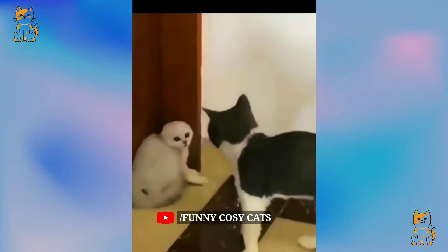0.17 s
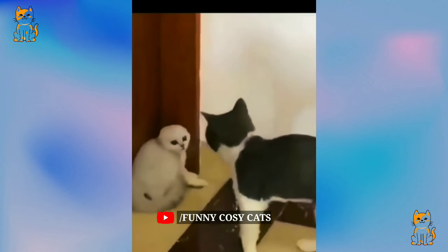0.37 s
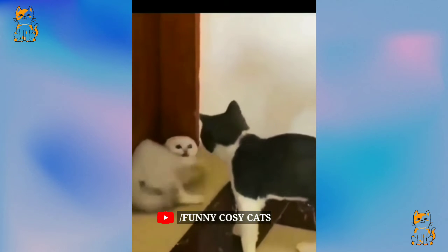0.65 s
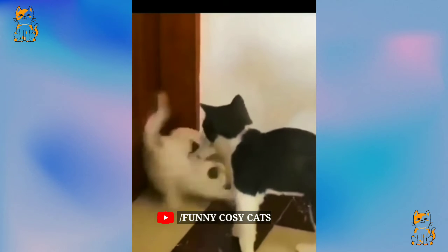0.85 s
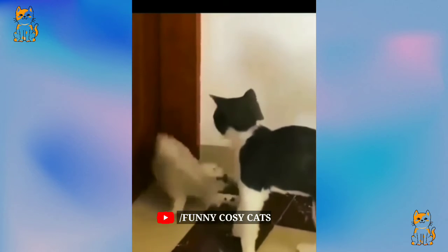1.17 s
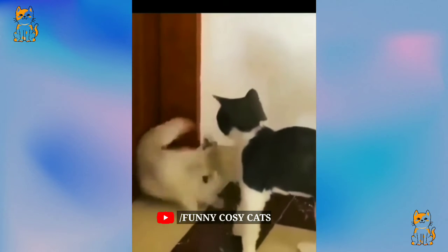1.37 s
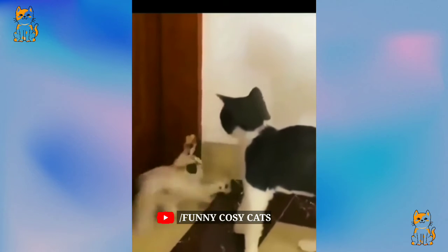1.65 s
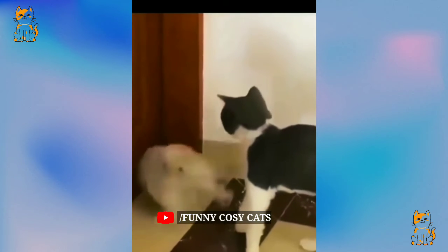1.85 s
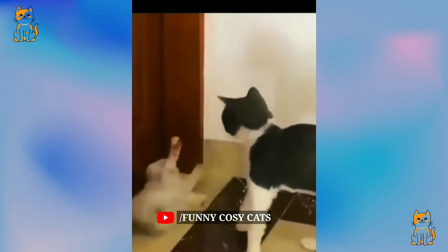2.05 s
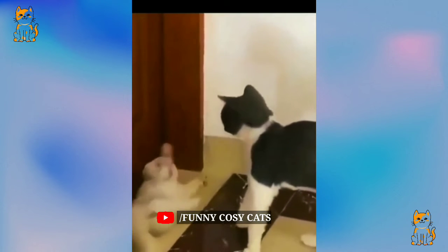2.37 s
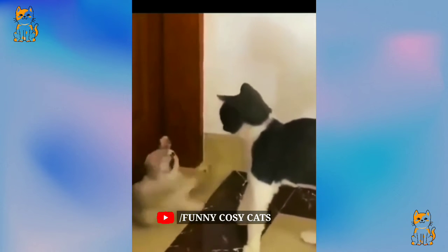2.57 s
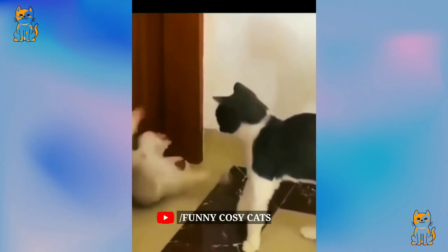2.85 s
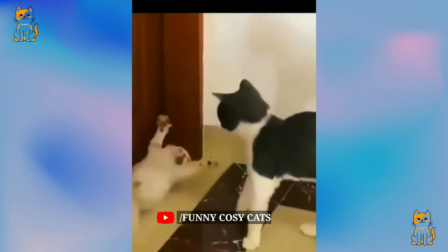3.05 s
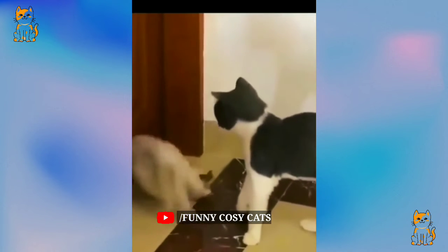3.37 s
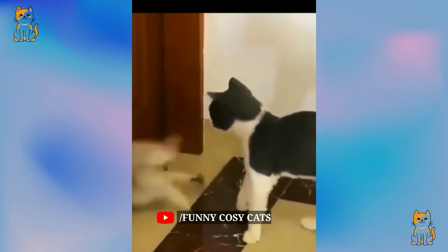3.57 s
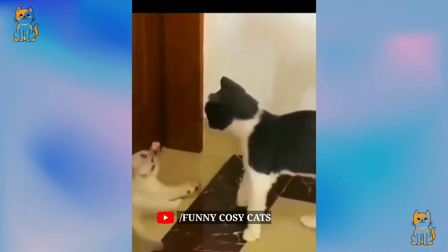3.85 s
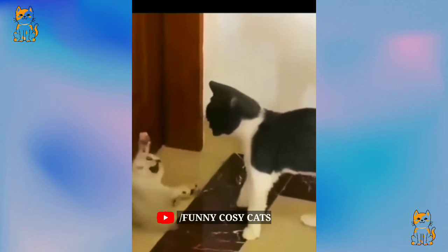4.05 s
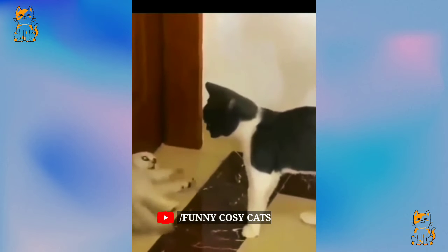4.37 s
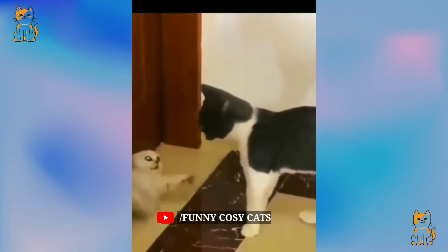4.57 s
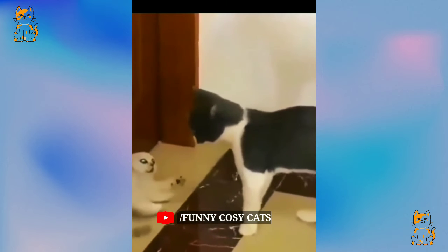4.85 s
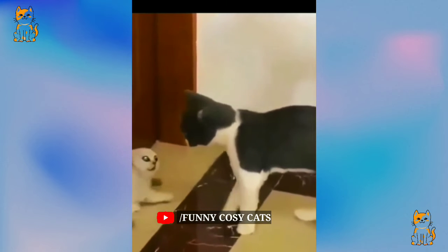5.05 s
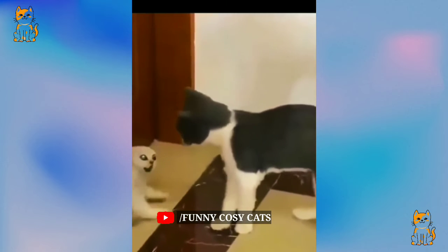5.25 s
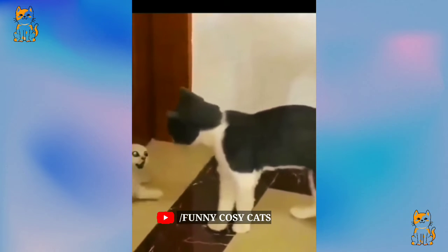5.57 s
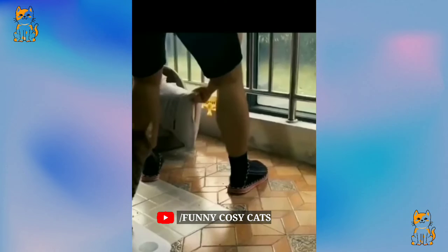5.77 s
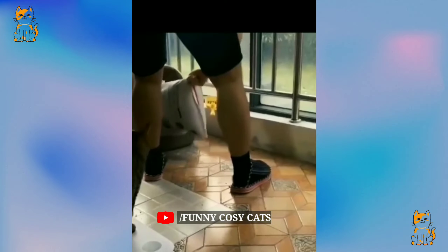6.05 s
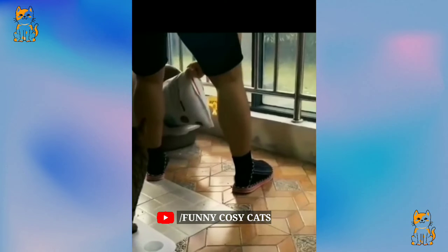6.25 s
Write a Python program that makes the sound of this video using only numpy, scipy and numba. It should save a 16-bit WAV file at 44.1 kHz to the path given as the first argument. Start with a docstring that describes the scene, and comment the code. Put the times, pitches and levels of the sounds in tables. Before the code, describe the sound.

In a bare tiled room, a kitten's low moan swells into a rasping scream with sharp spits. Fur slides and its body thuds on the floor. A second hoarse scream follows, then a high shriek sinking into a moan. A final clear rising cry is cut dead by rustling, small knocks and outdoor rumble. Phone microphone, moderately close, dull on top.

```python
"""A bare, tiled room: a cornered kitten yowls four times and tumbles on the floor between calls.
An uneven larynx drives throat and mouth resonances that climb with the jaw; air hisses at the teeth.
Filtered noise makes sliding fur, thuds, scraping paws and room tone; walls add echoes and a tail.
The last yowl is cut off by a change of scene: a balcony, with grainy rustling noise, rumble and knocks."""
import sys
import numpy as np
from scipy import signal
from scipy.fft import rfft, irfft
from scipy.io import wavfile
from scipy.ndimage import uniform_filter1d
from numba import njit

SR = 44100
rng = np.random.default_rng(int(sys.argv[2]) if len(sys.argv) > 2 else 0)


def digitize_waveform(pressure):
    """Quantize a signal to 16-bit integers and store it at the path in sys.argv[1].

    Rows of a 2-D input are taken as channels; values are limited to [-1, 1].
    """
    field = np.atleast_2d(pressure).T
    bounded = np.clip(field, -1, 1)
    quanta = np.round(bounded * 32767).astype(np.int16)
    wavfile.write(sys.argv[1], SR, quanta)


N = 282240
T = np.arange(N) / SR  # s


def undb(db):
    """Decibels to gain."""
    return 10 ** (np.asarray(db) / 20)


def unit(x):
    """Scale to rms 1."""
    return x / np.sqrt(np.mean(x ** 2))


def even(x):
    """Hold the rms at 1 over 40 ms, keeping the faster flutter."""
    power = uniform_filter1d(x ** 2, size=1764)
    return x / np.sqrt(np.abs(power) + 1e-12)


def contour(s, db, fade_s=0.034):
    """Gain curve through dB points, fading out beyond both ends."""
    gate = np.interp(T, [s[0] - fade_s, s[0], s[-1], s[-1] + fade_s], [0, 1, 1, 0])
    return gate * undb(np.interp(T, s, db))


def swells(table):
    """Gain curve of bell-shaped swells from rows of (start_s, level_db, length_s), start being the peak."""
    return sum(undb(db) * np.exp(-((T - s) / length * 2) ** 2) for s, db, length in table)


def walk(rate_hz):
    """Smooth chance with rms 1, changing about rate_hz times a second."""
    hold = max(int(SR / rate_hz), 2)
    steps = np.repeat(rng.standard_normal(N // hold + 1), hold)
    return unit(uniform_filter1d(steps, hold)[:N])


def noise(colour, grain_db=0):
    """Noise with a spectrum of (freq_hz, level_db) points; grain_db breaks it into grains."""
    hz, db = np.transpose(colour)
    f = np.maximum(np.fft.rfftfreq(N, 1 / SR), 1)
    grains = rng.standard_normal(N) * undb(grain_db * walk(900))
    spectrum_gain = undb(np.interp(np.log(f), np.log(hz), db))
    return unit(irfft(rfft(grains) * spectrum_gain, N))


@njit
def svf(x, hz, width_hz):
    """State-variable band-pass whose centre and width move."""
    y, band, low = np.empty(len(x)), 0., 0.
    for i in range(len(x)):
        g, k = np.tan(np.pi * hz[i] / SR), width_hz[i] / hz[i]
        v = (band + g * (x[i] + 1e-18 - low)) / (1 + g * (g + k))
        band, low, y[i] = 2 * v - band, low + 2 * g * v, k * v
    return y


def resonance(x, hz, width_hz):
    """A resonance with steep skirts: the band-pass applied twice."""
    hz = np.minimum(hz, .45 * SR) * np.ones(N)
    width_hz = width_hz * np.ones(N)
    return svf(svf(x, hz, width_hz), hz, width_hz)


def body(x, modes):
    """Resonances side by side, rows (freq_hz, half_width_hz, level_db); alternating signs fill valleys."""
    out = 0
    for k, (hz, half_width_hz, db) in enumerate(modes):
        out = out + (-1) ** k * undb(db) * resonance(x, hz, 2 * half_width_hz)
    return out


def lowpass(x, hz):
    """Steep elliptic low-pass."""
    return signal.sosfilt(signal.ellip(8, .2, 70, hz, fs=SR, output="sos"), x)


def room_tone():
    """Steady low-heavy noise of the room, its level drifting slightly."""
    # spectrum: freq_hz, level_db
    tone_colour = [(15, -69), (25, -26), (48, -8), (145, 2.5), (177, -4), (205, -3), (292, -9), (348, -3),
                   (447, -18.5), (494, -10.5), (815, -7.5), (972, -14.5), (2460, -30.5), (3000, -33.5),
                   (10000, -48), (13000, -93), (22000, -120)]
    return undb(-45 + .5 * walk(7.6)) * noise(tone_colour)


def ringing(level_db=-40, t60_s=0.7):
    """The room's ring of an earlier hiss dies away exponentially."""
    # spectrum: freq_hz, level_db
    ring_colour = [(350, -45), (600, -18), (906, -12), (984, -14), (1270, 0), (1580, -11), (3050, -3),
                   (5620, -14), (10000, -40), (13000, -70), (22000, -120)]
    return undb(level_db) * np.exp(-np.log(1000) * T / t60_s) * noise(ring_colour)


def crumple(x, patchy_db):
    """Each third of an octave swells and fades on its own, as folds of a rustled thing come and go."""
    octave = np.log2(np.maximum(np.fft.rfftfreq(N, 1 / SR), 1))
    spectrum = rfft(x)
    out = 0
    for k in range(23, 43):  # thirds of an octave above 1 Hz
        band = irfft(spectrum * np.maximum(1 - np.abs(3 * octave - k), 0), N)
        out = out + band * undb(patchy_db * walk(35))
    return unit(out)


def knocks():
    """Light contacts: decaying noise through shared modes, favouring those near each contact's pitch."""
    # contacts: start_s, level_db, brightest_ring_hz, decay_s (to 1/e)
    contacts = [(5.85, -32.5, 8000, .01), (6.017, -33, 1700, 0.01), (6.038, -35, 900, 0.024),
                (6.146, -30.5, 1730, 0.0067), (6.221, -26, 4200, 0.0032), (6.342, -35, 3000, .005)]
    # struck object's modes: freq_hz, half_width_hz, level_db
    knock_modes = [(980, 290, 10), (1830, 180, 11.5), (2760, 200, 6), (3970, 380, 1), (8900, 4200, -6)]
    out = 0
    for s, db, bright_hz, decay_s in contacts:
        modes = [(f, width, mode_db - 7 * abs(np.log2(f / bright_hz))) for f, width, mode_db in knock_modes]
        decay = np.exp(-np.abs(T - s) / decay_s) * (T >= s)
        out = out + undb(db) * decay * unit(body(rng.standard_normal(N), modes))
    return out


def balcony(rustle_db=-1, crisp_db=-8, handling_db=-41, outdoors_db=-40):
    """Grainy rustling with dull bumps and light knocks over an outdoor rumble, all shaped noise."""
    # rustling bouts: start_s (peak), level_db, length_s
    rustle_bouts = [(5.87, -41.5, 0.062), (5.97, -39.5, 0.14), (6.22, -47, 0.077), (6.35, -49, 0.037)]
    # spectra of rustle, its crisp treble and the outdoor rumble: freq_hz, level_db
    rustle_colour = [(240, -36), (400, -18), (594, -5.5), (655, -21), (677, -15), (789, -8), (871, -18),
                     (1050, -12.5), (1680, -4.5), (2340, -14.5), (2980, -10), (4510, -20.5), (5500, -15.5),
                     (7150, -47), (12100, -120)]
    crisp_colour = [(2650, -27), (4500, -26), (5980, -7.5), (6670, -9.5), (8260, -11.5), (9710, -14),
                    (11500, -11.5), (13000, -22), (14000, -34)]
    outdoor_colour = [(15, -52), (25, -24), (70, 3.5), (108, -10), (145, 2.5), (189, -11.5), (267, -8),
                      (372, -9), (408, -8), (600, -41), (780, -35), (1320, -120)]
    bouts = swells(rustle_bouts)
    handling = undb(handling_db) + bouts
    rustle = undb(rustle_db) * handling * crumple(noise(rustle_colour, grain_db=-0.5), patchy_db=4.0)
    crisp = undb(crisp_db) * handling * noise(crisp_colour, grain_db=1.5)
    rumble = (undb(outdoors_db) + bouts) * noise(outdoor_colour)  # bouts bump it too
    return rustle + crisp + rumble + knocks()


def scuffle(fur_db=-2, rumble_db=-8.0, paw_hz=3000, attack_s=0.059, decay_s=0.086):
    """Fur slides on the tiles, the tumbling body rumbles, paws scrape: bursts of coloured noise."""
    # fur slides and paw scrapes: start_s (peak), level_db, length_s
    slides = [(1.64, -38.5, 0.14), (1.88, -40.5, 0.24), (2.08, -30.5, .2), (2.33, -41.5, .06)]
    scrapes = [(2.306, -59, 0.027), (2.604, -58, 0.022), (5.105, -63, 0.032)]
    # body landings: start_s (peak), level_db
    thuds = [(1.7, -26.5), (1.84, -31.5), (2.03, -31), (2.42, -42.5)]
    # spectra: freq_hz, level_db
    fur_colour = [(120, -47), (200, -5.5), (425, -7.5), (672, -2), (778, -15), (1120, -4.5), (1340, -11.5),
                  (4000, -17.5), (10000, -30), (13000, -85), (22000, -120)]
    rumble_colour = [(18, -24), (30, -21), (54, 4.5), (97, -22.5), (129, 1.5), (167, -18), (227, -16),
                     (300, -29), (390, -53), (660, -120)]
    fur = undb(fur_db) * swells(slides) * noise(fur_colour, grain_db=1)
    paws = swells(scrapes) * unit(resonance(rng.standard_normal(N), paw_hz, 8000))
    weight = 0
    for s, db in thuds:
        weight = weight + undb(db) * np.exp(-np.maximum((s - T) / attack_s, (T - s) / decay_s))
    return fur + paws + undb(rumble_db) * weight * noise(rumble_colour)


def larynx(hz, rough, press, jitter=0.03505, waver=0.00592, stumble=0.01495, wander=0.00707, air=2.1,
           leak=0.042, rasp_db=2.5, flicker_db=8.5, soft_slope=1.28, hard_slope=0.025):
    """Vocal folds: mellow harmonics in a moan; uneven cycles, broken partials, air puffs in a scream."""
    wobble = jitter * rough * walk(450) + (waver + stumble * rough) * walk(50)
    wobble = wobble + wander * np.sqrt(rough) * walk(110)
    phase = 2 * np.pi * np.cumsum(hz * (1 + wobble)) / SR
    # pressed folds snap shut, which lifts the upper harmonics
    slope = soft_slope + (hard_slope - soft_slope) * press
    flicker = flicker_db * np.sqrt(rough)
    folds = even(sum(np.sin(k * phase) * undb(flicker * walk(40)) / k ** slope for k in range(1, 23)))
    puffs = unit(rng.standard_normal(N) * np.exp(np.cos(phase)))
    rasp = undb(rasp_db * np.sqrt(rough) * walk(140))
    # slack folds leak a little air even in a clean moan
    airflow = air * rough ** 1.28 + leak * (1 - press)
    return rasp * (np.sqrt(1 - rough ** 2) * folds + airflow * puffs)


def jaw_shape(jaw):
    """Resonances and levels of the voice at a given jaw opening."""
    # opening (0-1), throat_hz, mouth_hz, throat_db, mouth_db, teeth_db
    jaw_steps = [(0, 520, 1418, -31, -71, -78), (.1, 848, 1530, -29, -59.5, -70.5),
                 (.3, 1170, 1938, -28, -27.5, -55), (.45, 1410, 2440, -26, -26.5, -56),
                 (.75, 1550, 3687, -27, -20.5, -40), (1.001, 1858, 5226, -33.5, -16, -29.5)]
    opening, *columns = np.transpose(jaw_steps)
    return [np.interp(jaw, opening, c) for c in columns]


def kitten(throat_db=-2.0, throat_width=0.6, mouth_width=0.37, chest_db=-6, chest_open_db=-3,
           chest_width=0.35, chest_smear=1.2, tremble_db=1.45, throat_lead_s=0.028):
    """Larynx through throat and mouth resonances that climb as the jaw opens, with hiss at the teeth."""
    # yowls: start_s, pitch_hz, roughness (0-1), jaw_opening (0-1), effort_db
    moan_to_scream = [(.235, 246.2, 0.42, 0, -8), (.45, 282.4, 0.26, 0, -6.5), (.62, 342, 0.06, 0.01, -0.5),
                      (.79, 358.4, .3, .02, -2.5), (.825, 385, .7, .24, -4), (.875, 386, 0.66, 0.36, -4),
                      (.915, 389.8, 0.58, 0.79, 2), (1.01, 410.7, 0.54, 0.78, -2.5),
                      (1.14, 504, .16, 0.97, 4.5), (1.28, 496.1, 0.23, 0.87, 4), (1.35, 546, 0.64, 0.63, 5),
                      (1.43, 517, 0.72, 0.35, 5), (1.541, 432, 1.01, 0.28, -5)]
    rasping_scream = [(2.635, 345, 0.48, 0.17, 1), (2.79, 467, 0.51, 0.62, -3.5),
                      (2.92, 432, 0.82, 0.79, 1.5), (2.99, 424, 0.25, 0.85, 0),
                      (3.12, 426.2, .1, 0.82, -1.5), (3.17, 460, 0.53, 0.91, 6.5),
                      (3.27, 562, 0.64, 0.73, 1), (3.42, 497, 0.7, 0.29, 1), (3.61, 343, 0.75, 0.23, -4)]
    shriek_to_moan = [(3.85, 369.6, .5, 0.05, 6), (3.89, 436.8, .6, 0.24, 5), (3.97, 755, .9, 0.82, -1.5),
                      (4.07, 948.4, .7, 0.78, -1), (4.16, 874.4, .25, 0.49, 3), (4.25, 775, .65, .32, 2),
                      (4.35, 695, .72, 0.37, -0.5), (4.45, 594.6, .48, 0.24, 2), (4.51, 489, .25, 0.18, -1),
                      (4.681, 431.8, .13, 0.09, -2), (4.919, 425.4, .14, .08, 0.5),
                      (5.04, 371.7, .28, 0.06, 0), (5.11, 329, .1, 0.01, -17)]
    clear_rising_cry = [(5.468, 365, 0.3, 0.04, 2), (5.519, 482, .16, 0.2, -1),
                        (5.6, 529.4, .07, 0.41, 5.5), (5.655, 549, 0, 0.48, -7),
                        (5.72, 582.6, 0.18, .39, 2.5), (5.78, 630.6, 0.01, 0.3, -1)]
    # spits of air through bared teeth: start_s (peak), level_db, length_s
    spits = [(.95, -29.5, 0.089), (1.085, -18, 0.11), (2.85, -34, .07), (2.962, -14.5, .045),
             (3.08, -16, 0.094), (3.205, -22, .07), (4.06, -31.5, 0.094)]
    # fixed resonances: freq_hz, half_width_hz, level_db
    cheeks = [(2100, 450, -13), (4100, 450, -6)]
    teeth = [(5740, 330, 7.5), (7200, 890, -11.5), (8600, 610, -6.5)]

    calls = (moan_to_scream, rasping_scream, shriek_to_moan, clear_rising_cry)
    s, *columns = np.vstack(calls).T
    hz, rough, jaw = (np.interp(T, s, c) for c in columns[:3])
    effort = 0
    for call in calls:
        call_s, *_, effort_db = np.transpose(call)
        effort = effort + contour(call_s, effort_db)
    effort = effort * undb(tremble_db * walk(22))

    _, mouth_hz, low_db, middle_db, high_db = jaw_shape(jaw)
    # the throat moves just ahead of the jaw
    throat_hz = jaw_shape(np.interp(T + throat_lead_s, T, jaw))[0]
    opening = np.clip((mouth_hz - 1300) / 1700, 0, 1)
    source = larynx(hz, np.clip(rough, 0, 1), opening)

    # fundamental below the throat resonance: less with the jaw open, smeared to a low rasp by roughness
    chest = even(resonance(source, hz, (chest_width + chest_smear * rough ** 2) * hz))
    chest = undb(chest_db + chest_open_db * opening) * chest
    throat = even(resonance(source, throat_hz, throat_width * throat_hz)) + chest
    # a nearly closed mouth muffles the side resonances
    mouth = resonance(source, mouth_hz, mouth_width * mouth_hz) + opening * body(source, cheeks)
    voice = undb(throat_db + low_db) * even(throat) + undb(middle_db) * even(mouth)
    hiss = effort * undb(high_db) + swells(spits)
    return effort * voice + hiss * even(body(source, teeth))


def corner(x):
    """Door, wall and floor right beside the kitten throw its voice back and comb it."""
    # reflections: delay_s, level_db
    reflections = [(.0021, -22), (.0046, -13.5), (.0069, -15.5)]
    f = np.fft.rfftfreq(N, 1 / SR)
    comb = 1 + sum(undb(db) * np.exp(-2j * np.pi * f * delay) for delay, db in reflections)
    return irfft(rfft(x) * comb / np.sqrt(np.mean(np.abs(comb) ** 2)), N)


def room(x, t60_s=0.85, treble_t60_s=0.51, tail_db=-1.5, early_db=-8, early_s=0.0077):
    """Close walls answer almost at once; a diffuse tail follows, its treble dying first."""
    t = T[:SR]
    low_split = signal.butter(2, 3500, fs=SR, output="sos")
    high_split = signal.butter(2, 3500, "high", fs=SR, output="sos")
    lows = signal.sosfilt(low_split, rng.standard_normal(SR)) * 1000 ** (-t / t60_s)
    highs = signal.sosfilt(high_split, rng.standard_normal(SR)) * 1000 ** (-t / treble_t60_s)
    tail = (lows + highs) * (t > .008)
    early = rng.standard_normal(SR) * np.exp(-t / early_s) * (t > .002)
    response = (undb(tail_db) * unit(tail) + undb(early_db) * unit(early)) / np.sqrt(SR)
    return 0.9 * (x + signal.fftconvolve(x, response)[:N])


def scene(ceiling=.82, indoor_top_hz=10100, cut_s=5.776):
    """The room with the kitten, its loudest peaks rounded, then the balcony."""
    air = room(corner(kitten()) + scuffle()) + ringing() + room_tone()
    indoors = lowpass(ceiling * np.tanh(air / ceiling), indoor_top_hz)
    cut = np.clip((T - cut_s) / .002, 0, 1)  # 2 ms crossfade
    return ((1 - cut) * indoors + cut * balcony())[None]


def record(dry, top_hz=13300):
    """The phone cuts the top."""
    return lowpass(dry, top_hz)


dry = scene()
out = record(dry)
digitize_waveform(out)
```